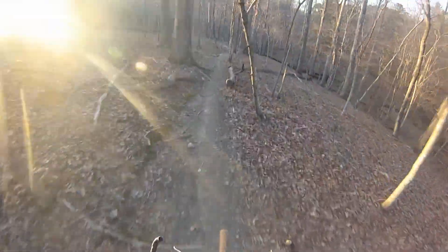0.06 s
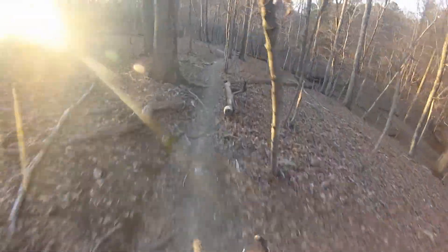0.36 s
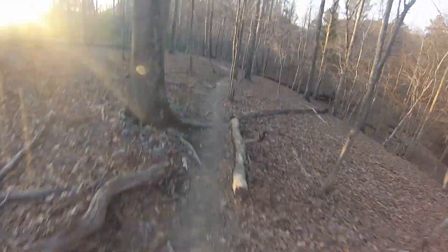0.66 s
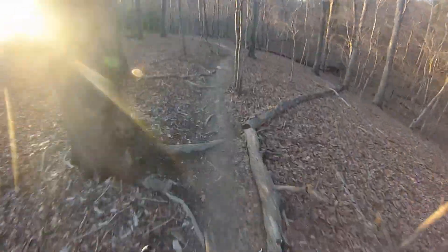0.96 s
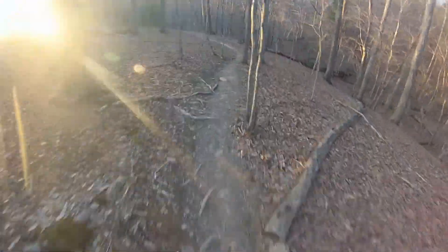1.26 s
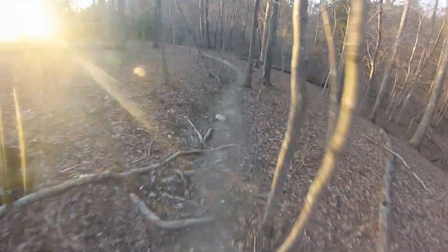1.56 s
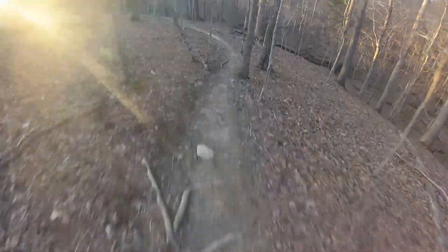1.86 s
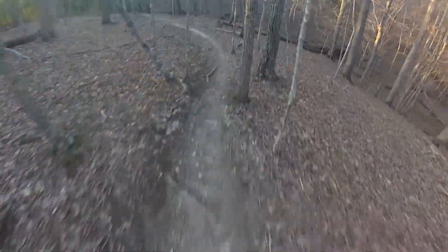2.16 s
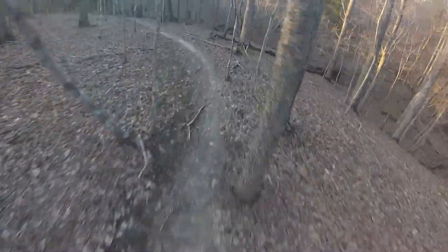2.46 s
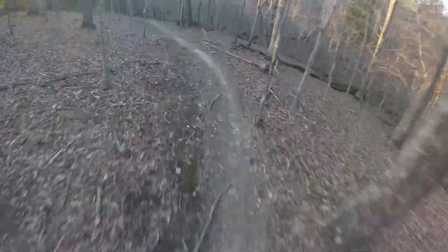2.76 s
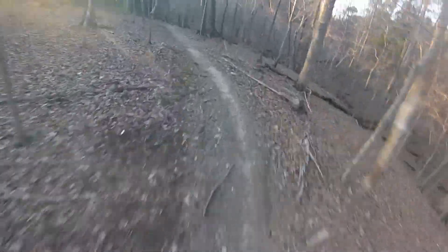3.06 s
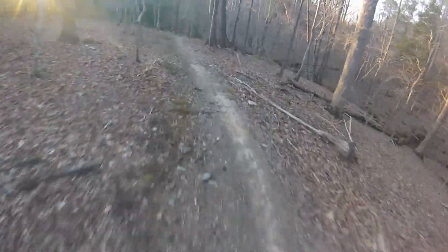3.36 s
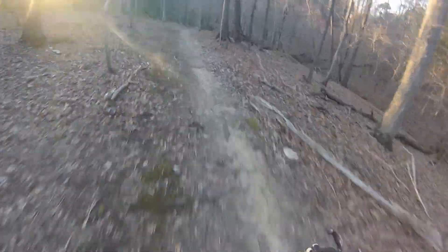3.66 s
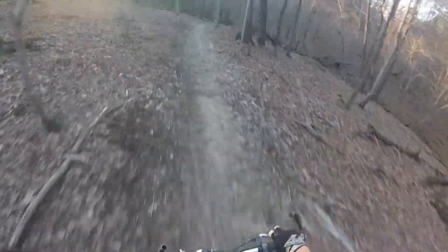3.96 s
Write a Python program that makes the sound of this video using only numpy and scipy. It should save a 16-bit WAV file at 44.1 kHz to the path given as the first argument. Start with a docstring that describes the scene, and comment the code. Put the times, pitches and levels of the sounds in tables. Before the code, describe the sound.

Heard close from the rider, a mountain bike thuds over a dirt trail in the woods with a faint tyre crunch. Chain and cable rattles pick up, joined by several hard clacks, while rumbling wind builds on the microphone.

```python
"""A mountain bike rolls down a leafy dirt trail, heard from a microphone on the rider.
At first the tyres crunch softly over soil and leaves, and bumps thud through the bike.
As speed builds, turbulent wind buffets the microphone and the chain and cables rattle harder.
From 1.6 s to 3.1 s, four hard clacks excite the modes of the frame and leave a small steel part
ringing, while stones and roots give three hollow pocks. Wind, thuds and rattles carry on to the end."""
import sys
import numpy as np
from scipy import signal
from scipy.fft import rfft, irfft
from scipy.io import wavfile
from scipy.ndimage import uniform_filter1d, map_coordinates

SR = 44100
rng = np.random.default_rng(int(sys.argv[2]) if len(sys.argv) > 2 else 0)


def unload_wav(signal):
    """Save mono or channel-first audio to the path in sys.argv[1] as 16-bit WAV at rate SR, clipped to [-1, 1]."""
    wavfile.write(
        sys.argv[1],
        SR,
        np.round(np.clip(np.atleast_2d(signal).T, -1, 1) * 32767).astype(np.int16),
    )


N = 4 * SR


def amp(db):
    """Amplitude ratio of a level in decibels."""
    return 10 ** (np.asarray(db) / 20)


def unit(x):
    """Normalisation to an rms of 1."""
    return x / np.sqrt(np.mean(x ** 2) + 1e-20)


def curves(rows):
    """Linear interpolation: one value per sample for each column after the time."""
    times, *columns = np.transpose(rows)
    return [np.interp(np.arange(N) / SR, times, column) for column in columns]


def wobble(rate):
    """Random modulation: a smooth curve through rate knots a second."""
    knots = rng.standard_normal(int(N * rate / SR) + 4)
    return map_coordinates(knots, [np.arange(N) * rate / SR])


def coloured(x, spectrum, size=16384):
    """Minimum-phase filtering at unit energy, shaped by (Hz, dB) points."""
    hz, db = np.transpose(spectrum)
    bins_hz = np.fft.rfftfreq(size, 1 / SR)
    gain = amp(np.interp(np.log(bins_hz + 1), np.log(hz + 1), db))
    cepstrum = irfft(np.log(gain))
    cepstrum[1:size // 2] *= 2  # folding makes the filter causal
    cepstrum[size // 2 + 1:] = 0
    response = irfft(np.exp(rfft(cepstrum)))[:size // 2]
    return signal.fftconvolve(x, response / np.linalg.norm(response))[:N]


def varied(x, depth_db, count=36):
    """Spectral ripple: random peaks and dips give each impact its own timbre."""
    hz = np.fft.rfftfreq(len(x), 1 / SR)
    ripple = np.interp(np.sqrt(hz / hz[-1]), np.linspace(0, 1, count), rng.standard_normal(count))
    return irfft(rfft(x) * unit(amp(depth_db * ripple)), len(x))


def add(track, start, sound):
    """Superposition of a sound on the track, from start in seconds."""
    part = track[max(round(start * SR), 0):][:len(sound)]
    part += sound[:len(part)]


# Rolling noise. Each row: time in seconds, relative level in dB.
ROLL_LEVELS = [(0, -71.5), (.55, -71.5), (.78, -70), (.88, -67), (1.0, -70), (1.27, -67.5), (1.36, -64),
               (1.56, -60.5), (1.7, -61), (1.8, -69.5), (1.95, -64.5), (2.12, -61.5), (2.42, -62.5),
               (2.56, -62), (2.82, -70), (2.9, -66.5), (3.08, -62.5), (3.27, -60), (3.42, -65), (3.75, -65),
               (4.0, -71)]
# Its spectrum. Each row: frequency in Hz, relative density in dB.
TYRE_SPECTRUM = [(200, -5.5), (500, 7.5), (950, 13.5), (1400, -1), (1800, 2.5), (2400, -4.5), (3100, 1),
                 (4100, -9.5), (5500, -6), (6400, -13), (9000, -18), (12000, -20), (14000, -33)]

def tyres(grains_per_s=260, grain_t60=0.026):
    """Shot noise: knobs crush soil and leaves in many tiny independent bursts, over a soft hiss."""
    roll_db, = curves(ROLL_LEVELS)
    hiss = unit(coloured(rng.standard_normal(N), TYRE_SPECTRUM)) * amp(0.8 * wobble(24.64))
    power_decay = amp(-60 * np.arange(SR // 20) / SR / grain_t60) ** 2
    borders_hz = [1300, 3800, 6500]  # between soil, grit, twigs and dry leaves
    band = np.searchsorted(borders_hz, np.fft.rfftfreq(N, 1 / SR))
    crunch = np.zeros(N)
    for k in range(len(borders_hz) + 1):
        grain_db = np.minimum(rng.exponential(size=N), 4)
        grains = amp(grain_db) * (rng.random(N) < grains_per_s / SR)
        power = np.abs(signal.fftconvolve(grains ** 2, power_decay)[:N])
        bursts = unit(np.sqrt(power)) * rng.standard_normal(N)
        crunch += irfft(rfft(bursts) * (band == k), N)
    clumps = amp(2.4 * wobble(70))
    crunch = unit(coloured(crunch * clumps, TYRE_SPECTRUM))
    return amp(roll_db) * (amp(-1.5) * hiss + amp(0.5) * crunch)


# Bumps in the trail. Each row: start in seconds, relative level in dB.
BUMPS = [(0.166, -37.5), (0.309, -39), (.514, -24), (.927, -34), (.971, -23.5), (1.095, -26.5),
         (1.264, -34.5), (1.408, -23.5), (1.492, -21), (1.519, -25), (1.641, -24), (1.993, -18.5),
         (2.168, -19), (2.212, -18), (2.284, -21), (2.313, -21.5), (2.371, -29.5), (2.547, -24),
         (2.72, -20.5), (2.761, -18), (2.802, -24), (3.18, -27.5), (3.328, -25.5), (3.385, -25),
         (3.497, -28), (3.521, -36), (3.851, -21), (3.948, -22.5), (3.981, -16.5)]
# Modes of bike and rider. Each row: nominal frequency in Hz, relative level in dB, T60 in seconds.
BODY_MODES = [(58.8, 2, 0.061), (125, -3.5, .04), (189.8, -1.5, 0.035), (306, -9, 0.017)]

def thuds(rise_s=0.0034):
    """Impulse response: each bump excites the low, heavily damped modes of bike and rider."""
    out, t = np.zeros(N), np.arange(SR // 5) / SR
    for start, db in BUMPS:
        body = np.zeros(len(t))
        for hz, mode_db, t60 in BODY_MODES:
            detune = np.exp(0.15 * rng.normal())
            body += amp(mode_db - 60 * t / t60) * np.sin(2 * np.pi * hz * detune * t)
        add(out, start, amp(db) * (1 - np.exp(-t / rise_s)) * body)
    return out


def clatter(rise_s, t60, tail_db, tail_t60, bounce_s=0.007, loss_db=7):
    """Inelastic rebound: a loose part makes three contacts, each weaker, and the frame shivers on."""
    t = np.arange(SR // 4) / SR
    contacts = bounce_s * np.cumsum(np.r_[0, rng.uniform(0.5, 1.5, 2)])
    power = amp(tail_db - 60 * t / tail_t60) ** 2
    for k, start in enumerate(contacts):
        power += (t >= start) * amp(-loss_db * k - 60 * abs(t - start) / t60) ** 2
    return np.sqrt(power) * (1 - np.exp(-t / rise_s)) * rng.standard_normal(len(t))


def mode(t, hz, db, t60, width_hz=96):
    """Line broadening: shaking makes the phase of a damped mode wander, which blurs its pitch."""
    wander = np.cumsum(rng.standard_normal(len(t))) * np.sqrt(2 * np.pi * width_hz / SR)
    envelope = amp(db + rng.normal() - 60 * t / t60)
    return envelope * np.sin(2 * np.pi * (hz * t + rng.random()) + wander)


# Hard impacts. Each row: start in seconds, relative levels of hit and steel ring in dB,
# ring pitch in Hz, its swell in seconds, a factor on its decay time.
IMPACTS = [(1.627, -38.5, -46, 11000, 0.0057, 0.78), (2.0404, -38, -42, 11150, 0.0085, 1),
           (2.2991, -39.5, -46.5, 11000, 0.013, 0.88), (3.1312, -47.5, -43, 11200, 0.0076, 0.72)]
# Their contact noise. Each row: frequency in Hz, relative density in dB.
IMPACT_SPECTRUM = [(200, -19), (800, 2), (1400, -4.5), (2200, -5), (2550, -7.5), (3100, -5.5), (3900, -8.5),
                   (4800, -5.5), (5900, -4), (6800, -9.5), (9000, -16.5), (12500, -19), (15000, -20)]
# Modes of the frame. Each row: frequency in Hz, relative level in dB, T60 in seconds.
FRAME_MODES = [(2278, -11, 0.047), (3120, -11.5, 0.037), (3510, -8, 0.045), (4330, -3, 0.032),
               (5370, -10, .035), (5900, -10, 0.042), (8600, -24, .035)]
# Modes of the steel part. Each row: ratio to ring pitch, relative level in dB, nominal T60 in seconds.
STEEL_MODES = [(0.953, -17, .13), (.974, -6, 0.12), (.99, -8.5, 0.17), (1.002, -1.5, 0.17),
               (1.009, -16, 0.2), (1.026, -11, .14), (1.046, -4, .12), (1.09, -6, 0.1), (1.17, -14, .06)]

def clacks(rise_s=0.002):
    """Free vibration: metal strikes the frame, and a steel part's close modes swell, beat and fade."""
    hits, rings = np.zeros((2, N))
    t = np.arange(SR // 3) / SR
    for start, db, ring_db, hz, swell_s, stretch in IMPACTS:
        contact = clatter(rise_s, t60=0.046, tail_db=-15, tail_t60=0.24)
        add(hits, start, amp(db) * varied(contact, depth_db=5))
        frame = sum(mode(t, *row) for row in FRAME_MODES)
        add(rings, start, amp(db) * frame * (1 - np.exp(-t / rise_s)))
        steel = sum(mode(t, hz * ratio, level, t60 * stretch) for ratio, level, t60 in STEEL_MODES)
        add(rings, start, amp(ring_db) * steel * (1 - np.exp(-(t / swell_s) ** 2)))
    return coloured(hits, IMPACT_SPECTRUM) + rings


# Taps of chain and cables. Each row: start in seconds, relative levels of knock and tick in dB.
TAPS = [(0.245, -59, -84), (0.316, -61, -62.5), (.448, -59, -83), (.514, -81, -71), (.686, -57, -86),
        (0.733, -58, -88), (0.851, -61, -64), (.874, -56.5, -68), (0.89, -59.5, -67), (.905, -57, -64.5),
        (.93, -55, -73), (1.013, -78, -86), (1.087, -56, -79), (1.303, -46, -61), (1.319, -44.5, -54),
        (1.437, -47, -64), (1.458, -56, -55.5), (1.549, -67, -57), (1.568, -44.5, -68), (1.609, -43, -53.5),
        (1.713, -76, -62), (1.771, -55, -66), (1.853, -49.5, -61.5), (1.984, -38, -57), (2.0, -48, -60),
        (2.027, -45, -54), (2.111, -52, -55), (2.183, -64, -52.5), (2.205, -47, -56), (2.299, -57, -49),
        (2.372, -73, -54), (2.433, -43.5, -52), (2.508, -47, -54.5), (2.635, -67, -56.5),
        (2.758, -59, -57.5), (2.796, -53, -64), (2.843, -51.5, -64), (2.883, -45, -60), (2.911, -50, -60),
        (2.963, -54, -62), (2.999, -52, -57), (3.017, -62, -54.5), (3.071, -74, -62), (3.112, -46, -69),
        (3.237, -48, -51), (3.256, -49.5, -58.5), (3.271, -46.5, -49.5), (3.297, -46.5, -55),
        (3.331, -55, -52), (3.435, -56, -79), (3.51, -44.5, -70), (3.524, -44.5, -62.5),
        (3.68, -48.5, -57.5), (3.575, -63, -73), (3.733, -53.5, -60.5), (3.864, -72, -61),
        (3.91, -64, -72.5), (3.957, -51.5, -71)]
# Spectra of knock and tick. Each row: frequency in Hz, relative density in dB.
KNOCK_SPECTRUM = [(200, -9), (600, 4), (1000, 6), (1400, 0.5), (1800, -0.5), (2400, -8), (3100, -8),
                  (4200, -21.5), (5500, -31.5), (8000, -46), (14000, -49)]
TICK_SPECTRUM = [(1000, -31), (2200, -13), (3100, 7), (3800, -7), (4500, 0), (5500, -1), (6400, -10.5),
                 (7300, -4), (8500, -13), (12000, -16), (14500, -29)]

def rattles(rise_s=0.0012):
    """Impact noise: chain and cables rebound on the frame, each tap a dull knock with a bright tick."""
    knocks, ticks = np.zeros((2, N))
    for start, knock_db, tick_db in TAPS:
        knock = clatter(rise_s, t60=0.021, tail_db=-9.5, tail_t60=0.12)
        add(knocks, start, amp(knock_db + 2.5) * varied(knock, depth_db=2))
        tick = clatter(rise_s, t60=0.024, tail_db=-10.5, tail_t60=0.08)
        add(ticks, start, amp(tick_db + 1) * varied(tick, depth_db=2.5))
    return coloured(knocks, KNOCK_SPECTRUM) + coloured(ticks, TICK_SPECTRUM)


# Stones and roots under the tyres. Each row: start in seconds, level in dB, pitch in Hz.
STONES_AND_ROOTS = [(1.684, -39.5, 945), (2.091, -38.5, 943), (2.697, -33.5, 1245)]

def pocks(rise_s=0.0019, t60=0.04, waver=0.035):
    """Damped resonance: a struck stone or root gives a hollow, wavering tone with a little grit."""
    tones, grit = np.zeros((2, N))
    t = np.arange(SR // 5) / SR
    for start, db, hz in STONES_AND_ROOTS:
        cycles = np.cumsum(hz * (1 + waver * wobble(820)[:len(t)])) / SR
        envelope = amp(db - 60 * t / t60) * (1 - np.exp(-t / rise_s))
        add(tones, start, envelope * np.sin(2 * np.pi * cycles))
        add(grit, start, 0.2 * envelope * rng.standard_normal(len(t)))
    return tones + coloured(grit, KNOCK_SPECTRUM)


# Light metal contacts. Each row: start in seconds, level in dB, centre frequency in Hz.
LINK_CONTACTS = [(.16, -71, 12000), (.886, -66.5, 7190), (.936, -73, 12200), (1.319, -68, 11900),
                 (1.547, -63, 6300), (1.712, -62, 6000), (2.182, -61, 5600), (2.55, -64.5, 7200),
                 (2.695, -65.5, 7100), (2.76, -59.5, 5380), (2.796, -64, 7200), (3.014, -55.5, 4490),
                 (3.236, -64, 4480), (3.271, -61, 11800), (3.281, -60, 11600), (3.295, -67, 11900),
                 (3.333, -59, 7000), (3.462, -66, 6130), (3.865, -69, 5250)]

def clinks(count=9, spread=0.049, rise_s=0.0015, t60=0.052):
    """Beating: chain links and small fittings touch and ring briefly on close, interfering partials."""
    out, t = np.zeros(N), np.arange(SR // 8) / SR
    for start, db, hz in LINK_CONTACTS:
        partials_hz = hz * (1 + spread * rng.standard_normal((count, 1)))
        cycles = partials_hz * t + rng.random((count, 1))
        ring = unit(np.sin(2 * np.pi * cycles).sum(0))
        add(out, start, amp(db - 60 * t / t60) * (1 - np.exp(-t / rise_s)) * ring)
    return out


# Wind on the microphone. Each row: time in seconds, relative levels of buffeting and rush in dB.
WIND_LEVELS = [(0.0, -55, -55.5), (0.09, -46.5, -61.5), (0.2, -46, -62.5), (0.42, -41, -53),
               (0.52, -37, -53.5), (0.54, -46, -57.5), (0.89, -48.5, -57.5), (0.97, -40.5, -53),
               (1.24, -43.5, -51), (1.27, -36.5, -57), (1.31, -44, -49.5), (1.53, -34.5, -46.5),
               (1.57, -42.5, -44), (1.67, -37.5, -47), (1.7, -45.5, -51), (1.8, -38, -46.5),
               (1.98, -34.5, -45), (2.12, -39.5, -48.5), (2.18, -32, -39.5), (2.46, -39, -49.5),
               (2.57, -31, -40), (2.65, -35.5, -42.5), (2.76, -31, -38), (3.06, -49, -51.5),
               (3.17, -36, -45), (3.42, -31.5, -40.5), (3.46, -38.5, -41.5), (3.51, -32, -38.5),
               (3.6, -34, -39), (4.0, -29.5, -40)]
# Spectra of buffeting and rush. Each row: frequency in Hz, relative density in dB.
BUFFET_SPECTRUM = [(10, -19.5), (25, -3.5), (45, 2), (80, -0.5), (130, -7.5), (200, -17.5), (400, -32.5),
                   (900, -89.5)]
RUSH_SPECTRUM = [(60, -35.5), (120, -4.5), (180, 0), (280, -6), (450, -12), (700, -20), (1000, -26.5),
                 (1500, -37.5), (3000, -46), (8000, -82.5)]

def wind():
    """Turbulence: eddies vary the pressure at the microphone, as low buffeting and a higher rush."""
    buffet_db, rush_db = curves(WIND_LEVELS)
    eddies = wobble(70)
    rumble = unit(coloured(rng.standard_normal(N), BUFFET_SPECTRUM)) * amp(2.4 * eddies)
    local_power = np.abs(uniform_filter1d(rumble ** 2, size=2600))
    buffet = rumble / np.sqrt(local_power + 1e-3)  # evens out slow swells, keeps the flutter
    rush = unit(coloured(rng.standard_normal(N), RUSH_SPECTRUM))
    rush = unit(rush * amp(1.9 * eddies + 2.2 * wobble(130)))
    return amp(buffet_db + 0.5) * buffet + amp(rush_db - 0.5) * rush


# Background hiss. Each row: frequency in Hz, relative density in dB.
AIR_SPECTRUM = [(500, -9.5), (3000, -4), (7000, -7.5), (12000, -7), (14000, -22)]

def air():
    """Stationary noise: a faint, steady broadband hiss."""
    return amp(-83) * coloured(rng.standard_normal(N), AIR_SPECTRUM)


def scene():
    """Free-field superposition: in the open wood the close sources add without echoes, in one channel."""
    bike = tyres() + thuds() + clacks() + rattles() + pocks() + clinks()
    return (bike + wind() + air())[None]


def record(dry):
    """Band limiting: the deepest rumble and highest treble are filtered out; the ends fade over 2 ms."""
    highpass = signal.butter(1, 12, "highpass", fs=SR, output="sos")
    lowpass = signal.cheby2(14, 60, 15800, fs=SR, output="sos")
    from_edge = np.minimum(np.arange(N), np.arange(N)[::-1])
    fade = np.minimum(1, from_edge / (0.002 * SR))
    return signal.sosfiltfilt(lowpass, signal.sosfilt(highpass, dry) * fade)


dry = scene()
out = record(dry)
unload_wav(out)
```